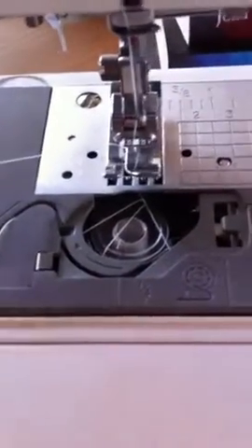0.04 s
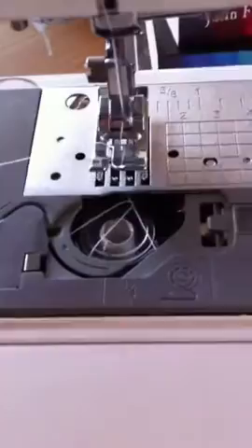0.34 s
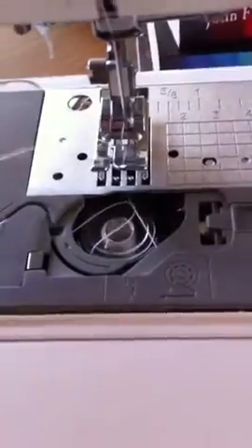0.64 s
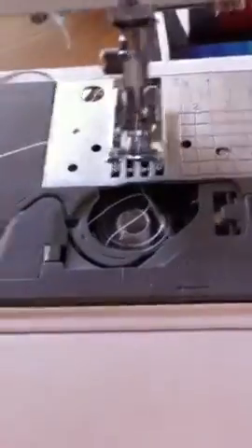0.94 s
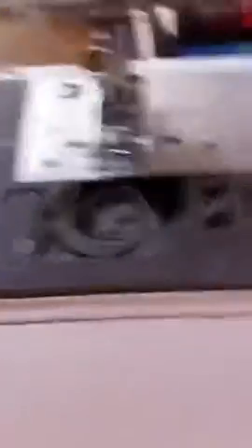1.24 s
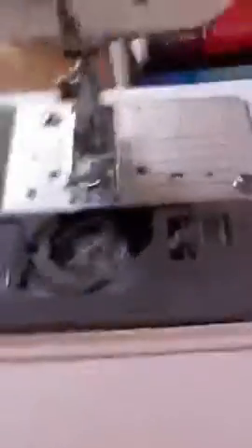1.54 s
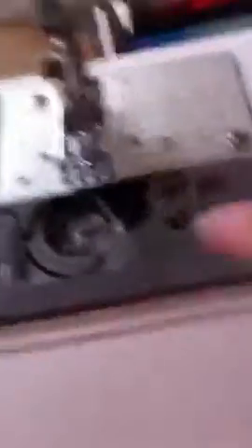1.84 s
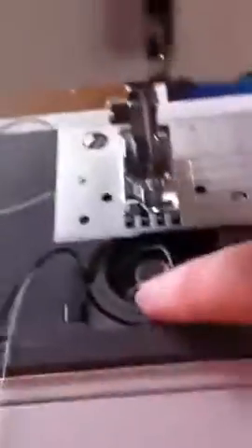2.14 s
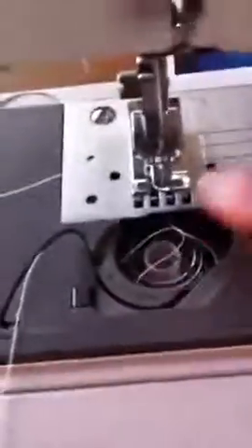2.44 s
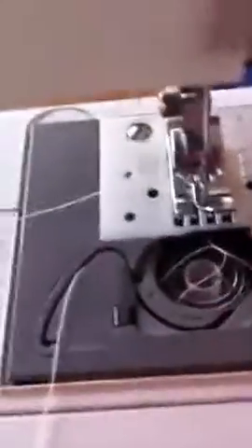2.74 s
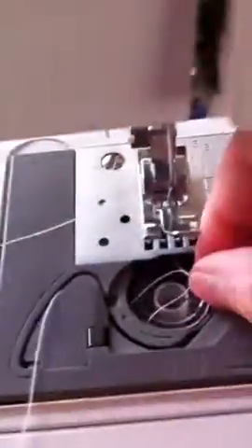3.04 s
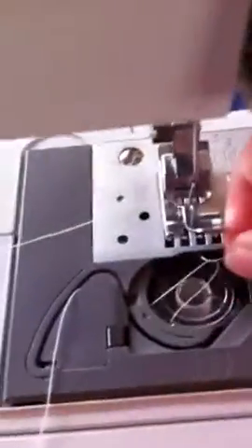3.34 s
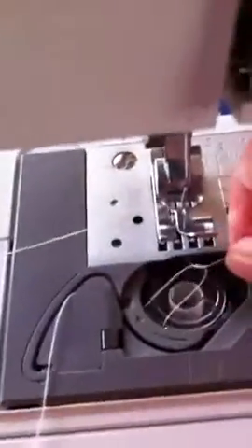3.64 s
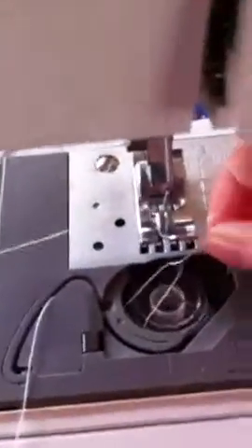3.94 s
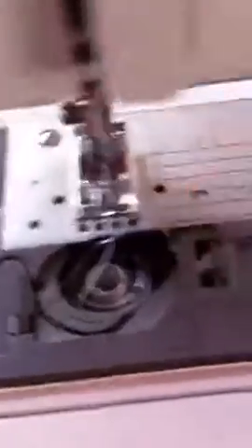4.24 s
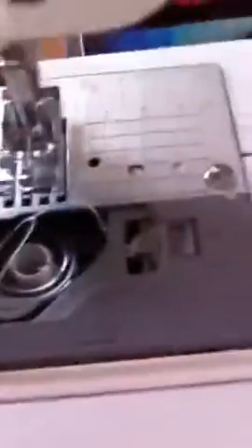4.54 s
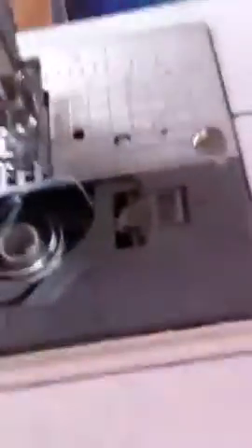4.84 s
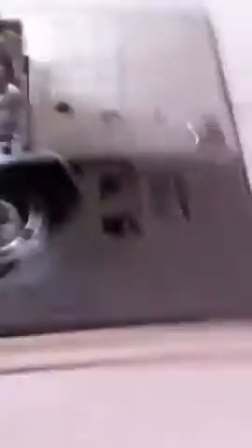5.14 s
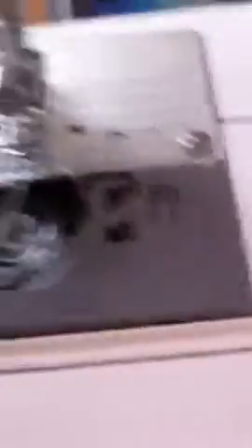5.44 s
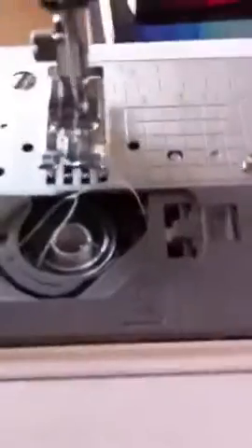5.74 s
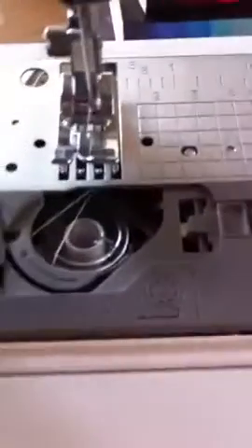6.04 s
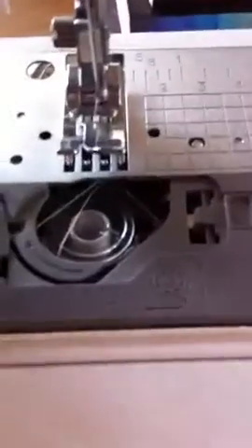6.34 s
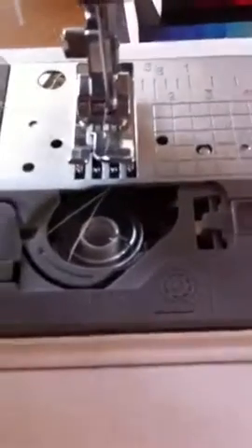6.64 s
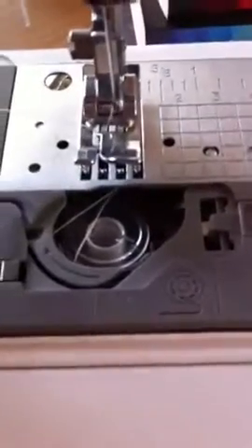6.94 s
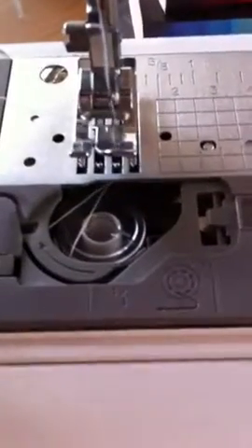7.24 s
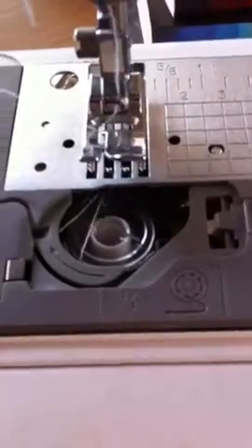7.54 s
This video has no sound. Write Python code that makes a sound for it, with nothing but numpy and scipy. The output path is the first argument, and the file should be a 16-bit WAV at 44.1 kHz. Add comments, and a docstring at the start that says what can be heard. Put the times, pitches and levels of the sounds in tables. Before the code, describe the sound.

Heard close up in a small, quiet room, a light scuff on a metal plate leads into the plastic ticking of a bobbin being fingered in a sewing machine. A sharp pop and a louder, briefly rattling snap come near the middle, followed by soft thuds on the hollow cover. After a lull, a fingernail taps once and the bobbin rubs round with small, uneven clicks.

```python
"""Handling a sewing machine bobbin

In a quiet room, fingers work the thread bobbin in its drop-in case. It ticks against the plastic,
pops out, snaps home on the steel hook and whirrs, then scrapes round as the thread is drawn.
The hollow machine bed answers the contacts; fingers tap, bump and brush the cover and plate.
Blows ring damped modes; stick-slip jerks drive the same modes into scrapes."""
import sys
import numpy as np
from scipy import signal
from scipy.fft import rfft, irfft, next_fast_len
from scipy.io import wavfile
from scipy.ndimage import uniform_filter1d

SR = 44100
rng = np.random.default_rng(int(sys.argv[2]) if len(sys.argv) > 2 else 0)


def wav_out(sig):
    """Save sig, one row per channel (or a flat mono array), as 16-bit PCM at SR to the path in sys.argv[1]."""
    wavfile.write(sys.argv[1], SR, np.round(np.clip(np.atleast_2d(sig).T, -1, 1) * 32767).astype(np.int16))


N = 338247
TIME_S = np.arange(N) / SR
BLOW_S = np.arange(SR // 6) / SR  # time since a blow


def amp(db):
    """Decibels to gain."""
    return 10 ** (np.asarray(db) / 20)


def unit(x):
    """Scale to rms 1."""
    return x / np.sqrt(np.mean(x ** 2) + 1e-20)


def unit_peak(x):
    """Scale the loudest 3 ms to rms 1."""
    return x / np.sqrt(uniform_filter1d(x ** 2, size=128, mode="constant").max())


def decay(t60_s):
    """Exponential decay after a blow."""
    return np.exp(-np.log(1000) * BLOW_S / t60_s)


def swell(start_s, length_s, rise_s=0.0051, fall_s=0.022):
    """Linear rise, hold, exponential release; the defaults suit a stroke."""
    rise = np.clip((TIME_S - start_s) / rise_s, 0, 1)
    return rise * np.exp(-np.maximum(TIME_S - start_s - length_s, 0) / fall_s)


def wobble(rate_hz):
    """Random curve through Gaussian knots."""
    knots = rng.standard_normal(int(N * rate_hz / SR) + 2)
    return np.interp(TIME_S * rate_hz, np.arange(len(knots)), knots)


def log_interp(points, hz):
    """Read (frequency, value) points on a log axis."""
    knots_hz, values = np.transpose(points)
    return np.interp(np.log(hz + 1), np.log(knots_hz + 1), values)


def filtered(x, response):
    """Apply a gain given as a function of frequency."""
    size = next_fast_len(N + SR // 2)
    return irfft(rfft(x, size) * response(np.fft.rfftfreq(size, 1 / SR)), size)[:N]


def coloured(x, spectrum):
    """Shape x by a spectrum table, to rms 1."""
    return unit(filtered(x, lambda hz: amp(log_interp(spectrum, hz))))


def resonate(x, hz, t60_s):
    """One damped mode driven by x."""
    radius = np.exp(-np.log(1000) / (t60_s * SR))
    angle = 2 * np.pi * hz / SR
    return signal.lfilter([0, radius * np.sin(angle)], [1, -2 * radius * np.cos(angle), radius ** 2], x)


def burst(low_hz, high_hz, t60_s):
    """Many close, damped modes: a decaying noise band."""
    band = signal.butter(2, [low_hz, high_hz], "bandpass", fs=SR, output="sos")
    return unit_peak(signal.sosfilt(band, rng.standard_normal(len(BLOW_S)) * decay(t60_s)))


def ring(modes, scatter_db):
    """Struck modes; strength and sign vary with where the blow lands."""
    out = np.zeros(len(BLOW_S))
    for hz, db, t60_s in modes:
        strength = rng.choice([-1, 1]) * amp(db + scatter_db * rng.standard_normal())
        out += strength * np.sin(2 * np.pi * hz * BLOW_S) * decay(t60_s)
    return unit_peak(out)


def blows(events, small_modes, large_modes, ring_db, dense_db, tick_t60_s, dense_t60_s,
          crack_db, crack_t60_s, crack_top_hz, inertia_s):
    """Each blow cracks, rings the small part and knocks the large one; its spot may colour the tick."""
    out = np.zeros(N + len(BLOW_S))
    for time_s, tick_db, knock_db, *spot_hz in events:
        tick = burst(2500, 5940, tick_t60_s)
        tick = unit_peak(tick + amp(ring_db) * ring(small_modes, scatter_db=2.5))
        knock = ring(large_modes, scatter_db=3) + amp(dense_db) * burst(345, 2080, dense_t60_s)
        knock = unit_peak(knock * (1 - np.exp(-BLOW_S / inertia_s)))
        tick += amp(crack_db) * burst(6500, crack_top_hz, crack_t60_s)
        for hz in spot_hz:
            favoured = signal.lfilter(*signal.iirpeak(hz, Q=8.6, fs=SR), tick)
            tick = unit_peak(tick + amp(9) * favoured)
        out[round(time_s * SR):][:len(BLOW_S)] += amp(tick_db) * tick + amp(knock_db) * knock
    return out[:N]


def slips(rate_hz, spread_db):
    """Stick-slip: tiny uneven jerks at random moments."""
    impulses = (rng.random(N) < rate_hz / SR) * rng.choice([-1, 1], N)
    return unit(impulses * amp(spread_db * rng.standard_normal(N)))


# room air: (frequency [Hz], gain [dB])
AIR_SPECTRUM = [(20, -38), (43, -20), (56, -31), (80, -5.5), (108, -7.5), (145, -3), (242, -2), (380, -9),
                (1400, -14.5), (3080, -19), (14000, -27)]
# hum swells: (start [s], length [s], level [dB])
HUM_SWELLS = [(-.05, 1.3, -73), (3.65, 3.7, -73.5)]
def background():
    """Steady room air; a low, wavering hum with its octave swells twice."""
    hum_hz = 76.5 + 4 * wobble(19)
    phase = 2 * np.pi * np.cumsum(hum_hz) / SR
    hum = unit(amp(2.3 * wobble(9.5)) * (np.sin(phase) + amp(-3) * np.sin(2 * phase)))
    envelope = sum(amp(db) * swell(start_s, length_s, rise_s=0.096, fall_s=0.11)
                   for start_s, length_s, db in HUM_SWELLS)
    air = coloured(rng.standard_normal(N), AIR_SPECTRUM)
    return amp(-63) * air + np.maximum(envelope, amp(-86.5)) * hum


# needle plate and its edge: (frequency [Hz], gain [dB], t60 [s])
PLATE_MODES = [(520, -12, .04), (931, 0, .04), (1060, -7, .03), (1890, -26, .33)]
PLATE_EDGE_MODES = [(3650, 0, .015), (4020, 1, .015), (5800, -1, .01), (7900, -2, .008)]
# scuffs: (time [s], tick gain [dB], knock gain [dB])
PLATE_SCUFFS = [(1.0305, -63, -61), (1.0632, -53, -55), (1.0768, -50, -44.5)]
def plate_scuffs():
    """Something light scuffs and knocks on the needle plate."""
    return amp(-3) * blows(
        PLATE_SCUFFS, PLATE_EDGE_MODES, PLATE_MODES, ring_db=9, dense_db=-12, tick_t60_s=0.019,
        dense_t60_s=0.04, crack_db=-6, crack_t60_s=0.045, crack_top_hz=11600, inertia_s=0.00072)


# brushing hiss: (frequency [Hz], gain [dB])
BRUSH_SPECTRUM = [(150, -52), (600, 8.5), (2600, 3), (3800, 1), (4700, -7.5), (5700, 0), (16000, -14)]
# swishes: (centre [s], Gaussian sigma [s], level [dB], sizzle [Hz], bandwidth [Hz])
BRUSH_STROKES = [(1.062, 0.018, -60.5, 3860, 690), (2.264, 0.009, -65, 5640, 1200),
                 (2.288, .03, -69.5, 9600, 2500), (2.79, 0.012, -53, 1540, 900),
                 (4.661, 0.012, -62.5, 5300, 2000), (6.62, 0.093, -69, 3080, 700),
                 (6.622, .075, -70.5, 9000, 600), (7.163, .02, -67.5, 5100, 350),
                 (7.435, .014, -67, 5070, 400)]
def brushing():
    """Skin and thread brush the plate: fine grains, each swish sizzling at its own pitch."""
    hiss = coloured(slips(rate_hz=3600, spread_db=1), BRUSH_SPECTRUM)
    out = np.zeros(N)
    for centre_s, sigma_s, db, sizzle_hz, width_hz in BRUSH_STROKES:
        span = np.abs(TIME_S - centre_s) < 4 * sigma_s
        envelope = np.exp(-.5 * ((TIME_S[span] - centre_s) / sigma_s) ** 2)
        peak = signal.iirpeak(sizzle_hz, sizzle_hz / width_hz, fs=SR)
        sizzle = unit(signal.lfilter(*peak, hiss[span]))
        out[span] += amp(db) * envelope * unit(hiss[span] + amp(2) * sizzle)
    return out


# bobbin rim and machine bed: (frequency [Hz], gain [dB], t60 [s])
RIM_MODES = [(2780, -1, .015), (3050, 0, .015), (3480, -1, .011), (3830, 0, .011), (5080, -1, .013),
             (8900, -8, .009)]
BED_MODES = [(330, -15, .06), (440, -11, .055), (590, -3, .06), (648, -2, .08), (710, -5, .07),
             (835, 0, .07), (940, -4, .05), (1160, -9, .045), (1280, -11, .04), (1470, -8, .035),
             (1670, -8, .03), (1880, -10, .03)]
# catches: (time [s], tick gain [dB], knock gain [dB], spot pitch [Hz])
RIM_CATCHES = [(1.6408, -56.5, -60, 4500), (5.2111, -51.5, -56.5, 4250), (5.6211, -59.5, -56, 3470),
               (6.2073, -52, -67, 5800), (6.5056, -54, -52, 3000), (6.5355, -47, -47.5, 8900),
               (6.6812, -44.5, -39, 3000), (6.7395, -52.5, -69, 3800), (6.7566, -47, -48, 3740),
               (6.8631, -59, -57, 5100), (6.8881, -57, -53.5, 3800), (6.9245, -60, -55, 3030),
               (6.9539, -59, -65, 5060), (7.1462, -53, -55, 5050), (7.2235, -53.5, -48, 3030),
               (7.4216, -56, -49.5, 5000), (7.4882, -58, -68, 9300)]
def rim_catches():
    """The turning bobbin catches on its rim and knocks the bed."""
    return amp(-2) * blows(
        RIM_CATCHES, RIM_MODES, BED_MODES, ring_db=4, dense_db=-11.5, tick_t60_s=0.016,
        dense_t60_s=0.064, crack_db=-1.5, crack_t60_s=0.018, crack_top_hz=14800, inertia_s=0.002)


# plastic case: (frequency [Hz], gain [dB], t60 [s])
CASE_MODES = [(2050, -7, .015), (2680, 0, .018), (2830, 1, .02), (4750, -3, .011), (5080, 1, .012),
              (5900, -3, .01), (6650, -8, .01)]
# contacts: (time [s], tick gain [dB], knock gain [dB], spot pitch [Hz])
CASE_TICKS = [(2.0004, -66, -48.5, 2000), (2.1186, -40.5, -41.5, 2080), (2.1844, -47, -45, 2400),
              (2.2004, -59, -45, 5200), (2.3291, -45.5, -44.5, 2780), (2.4114, -40.5, -45, 5340),
              (2.4244, -46, -52, 2700), (2.4329, -40.5, -46.5, 5000), (2.7546, -59, -47.5, 5000),
              (2.964, -62, -43, 3000), (3.057, -49.5, -48.5, 2500), (3.1785, -68, -47, 2000),
              (3.5274, -54.5, -52, 5000), (6.1105, -48, -38.5, 3460), (6.134, -52, -59, 3370)]
def case_ticks():
    """The fingered bobbin touches its case; the bed answers."""
    return amp(-5) * blows(
        CASE_TICKS, CASE_MODES, BED_MODES, ring_db=8, dense_db=-7.5, tick_t60_s=0.0081,
        dense_t60_s=0.12, crack_db=-17, crack_t60_s=0.026, crack_top_hz=13000, inertia_s=0.0017)


# broad rumble of a push; bass tilt of a soft contact: (frequency [Hz], gain [dB])
PUSH_SPECTRUM = [(100, -26), (300, 1), (690, -5.5), (1000, -13), (3000, -34)]
SOFT_CONTACT_SPECTRUM = [(650, -1), (900, -3.5), (1500, -4), (3000, -2)]
def sliding(strokes, modes, slip_hz, grit_db, shift_db, push_db):
    """Stick-slip rings a part and rumbles in the bed; the moving contact favours changing modes."""
    gaps_s = np.exp(.6 * rng.standard_normal(2000)) / slip_hz
    sizes = amp(3.5 * rng.standard_normal(2000))
    jerks = np.bincount((np.cumsum(gaps_s) * SR).astype(int), sizes, minlength=N)[:N]
    friction = unit(jerks) + amp(grit_db) * slips(rate_hz=2500, spread_db=4)
    scrape = unit(sum(amp(db + shift_db * wobble(17)) * resonate(friction, hz, t60_s)
                      for hz, db, t60_s in modes))
    push = coloured(slips(rate_hz=1500, spread_db=3), PUSH_SPECTRUM)
    bed = np.zeros(N)
    for hz, db, t60_s in BED_MODES:
        gain = amp(db + 3 * wobble(22))
        bed += gain * resonate(slips(rate_hz=900, spread_db=3), hz, .6 * t60_s)  # contact damps the ring
    rumble = coloured(unit(bed) + amp(push_db) * push, SOFT_CONTACT_SPECTRUM)
    pressure = unit(amp(3 * wobble(50)))
    return pressure * sum(swell(start_s, length_s) * (amp(rumble_db) * rumble + amp(scrape_db) * scrape)
                          for start_s, length_s, rumble_db, scrape_db in strokes)


# drags: (start [s], length [s], rumble gain [dB], scrape gain [dB])
FINGER_DRAGS = [(2.085, 0.07, -60, -74), (2.25, 0.13, -64, -63), (2.44, 0.043, -57, -82),
                (2.88, 0.13, -60, -70.5), (3.19, 0.017, -57, -82), (3.25, 0.084, -58, -84)]
def finger_drags():
    """A fingertip drags the bobbin in its case."""
    return amp(-0.5) * sliding(FINGER_DRAGS, CASE_MODES, slip_hz=79, grit_db=5, shift_db=7, push_db=-3.5)


# hollow cover: (frequency [Hz], gain [dB], t60 [s])
COVER_MODES = [(165, -17, .1), (430, -14, .05), (590, -4, .05), (662, 0, .06), (832, 0, .048),
               (935, -3, .042), (1500, -9, .04), (1717, -7, .055), (3420, -17, .03), (4700, -19, .02)]
# bumps: (time [s], level [dB])
COVER_BUMPS = [(2.787, -50), (2.7965, -42.5), (4.062, -44), (4.074, -47), (4.1205, -35), (4.131, -41),
               (4.155, -51)]
def cover_bumps(pad_s=0.0013):
    """A soft finger pad spreads each bump into a dull thud, with a faint click of skin and nail."""
    onset = 1 - np.exp(-(BLOW_S / pad_s) ** 2)
    out = np.zeros(N + len(BLOW_S))
    for time_s, db in COVER_BUMPS:
        thud = unit_peak(ring(COVER_MODES, scatter_db=0) * onset)
        click = amp(-19.5) * burst(2200, 5100, t60_s=0.036)
        out[round(time_s * SR):][:len(BLOW_S)] += amp(db) * (thud + click)
    return out[:N]


# clicks: (time [s], tick gain [dB], knock gain [dB])
THREAD_CLICKS = [(2.9598, -35.5, -54), (3.7873, -48.5, -46), (3.8137, -46, -52)]
def thread_clicks():
    """The taut thread slips and the bobbin clicks drily."""
    return amp(-4) * blows(
        THREAD_CLICKS, RIM_MODES, BED_MODES, ring_db=1, dense_db=-6, tick_t60_s=0.0082,
        dense_t60_s=0.071, crack_db=-19, crack_t60_s=0.0093, crack_top_hz=9800, inertia_s=0.0024)


# bobbin flanges and hollow seat: (frequency [Hz], gain [dB], t60 [s])
FLANGE_MODES = [(2350, -6, .035), (3350, -2, .022), (4620, 0, .022), (4970, 1, .022), (5950, -5, .026),
                (6650, -5, .028), (8300, -8, .025), (9460, -8, .025)]
SEAT_MODES = [(646, -2, .07), (845, 0, .06), (1290, -6, .035), (1523, -4, .04), (1760, -6, .035)]
# pops: (time [s], tick gain [dB], knock gain [dB])
SEAT_POPS = [(3.2753, -28, -28.5), (3.2812, -31.5, -30.5), (3.2868, -41, -36), (3.3116, -43, -45)]
def seat_pops():
    """The bobbin pops out of its seat and falls back."""
    return amp(-1.5) * blows(
        SEAT_POPS, FLANGE_MODES, SEAT_MODES, ring_db=0.5, dense_db=-5, tick_t60_s=0.0048,
        dense_t60_s=0.06, crack_db=-6, crack_t60_s=0.02, crack_top_hz=15800, inertia_s=0.00067)


# steel hook and its carrier: (frequency [Hz], gain [dB], t60 [s])
HOOK_MODES = [(2550, -12, .05), (2760, -5, .04), (3215, -1, .026), (3430, -9, .03), (4585, 4, .024),
              (4920, -3, .025), (5130, 0, .016), (5400, -2, .016), (5905, -5, .022), (6780, -3.5, .036),
              (9400, -11, .02), (10500, -8, .02)]
CARRIER_MODES = [(170, -14, .035), (440, -9, .04), (655, -6, .075), (812, 3, .055), (1165, -7, .07),
                 (1440, -1, .05), (1720, -5, .035)]
# snaps: (time [s], tick gain [dB], knock gain [dB])
HOOK_SNAPS = [(3.7185, -55, -45), (3.7228, -36, -30.5), (3.7262, -29, -32), (3.7274, -16, -35.5),
              (3.7333, -33, -29), (3.7365, -31, -31)]
def hook_snaps():
    """The bobbin snaps home and chatters, ringing the hook and knocking its carrier."""
    return amp(-2.5) * blows(
        HOOK_SNAPS, HOOK_MODES, CARRIER_MODES, ring_db=2.5, dense_db=0, tick_t60_s=0.0023,
        dense_t60_s=0.042, crack_db=-11.5, crack_t60_s=0.019, crack_top_hz=11400, inertia_s=0.00044)


# resonances rubbed by the spin: (frequency [Hz], gain [dB], t60 [s])
WHIRR_MODES = [(420, -7, .12), (592, 0, .2), (720, -6, .07), (870, -9, .045)]
def free_spin():
    """After the snap the bobbin spins on, rattling and whirring in its seat."""
    whirr = sum(amp(db) * unit(resonate(rng.standard_normal(N), hz, t60_s))
                for hz, db, t60_s in WHIRR_MODES)
    rattle = amp(3 * wobble(110))
    envelope = swell(start_s=3.825, length_s=0.11)
    return amp(-56) * unit(whirr * rattle * envelope) * np.sqrt(np.mean(envelope ** 2))


# fingernail tick and dead thud: (frequency [Hz], gain [dB], t60 [s])
NAIL_MODES = [(2950, 4.5, 0.013), (3540, -20, 0.011), (5650, 5, 0.011), (6260, 10, 0.007)]
THUD_MODES = [(370, -1, .035), (485, 1, .03), (867, -1, .025), (1255, -1, .028), (1577, -4, .028),
              (2016, -8, .025)]
# tap: (time [s], tick gain [dB], knock gain [dB])
FINGER_TAP = [(6.2473, -37, -31)]
def finger_tap():
    """One dry tap: the nail ticks over a dead thud."""
    return amp(-6) * blows(
        FINGER_TAP, NAIL_MODES, THUD_MODES, ring_db=20, dense_db=-4.5, tick_t60_s=0.0055,
        dense_t60_s=0.028, crack_db=-7.5, crack_t60_s=0.017, crack_top_hz=11300, inertia_s=0.00058)


# turns: (start [s], length [s], rumble gain [dB], scrape gain [dB])
THREAD_TURNS = [(6.495, 0.27, -57.5, -65), (6.76, 0.18, -57, -64.5), (7.12, 0.12, -59, -68),
                (7.405, 0.11, -67, -68)]
def thread_turns():
    """The drawn thread turns the bobbin, rubbing its rim."""
    return amp(-2) * sliding(THREAD_TURNS, RIM_MODES, slip_hz=105, grit_db=-5, shift_db=5, push_db=1.5)


# room decay: (frequency [Hz], t60 [s])
ROOM_DECAY = [(200, .25), (800, .2), (3000, .12), (12000, .08)]
def room(x):
    """Small furnished room: the treble dies first."""
    hz, time_s, noise = signal.stft(rng.standard_normal(SR // 2), SR, nperseg=256)
    envelope = np.exp(-np.log(1000) * time_s / log_interp(ROOM_DECAY, hz)[:, None])
    _, tail = signal.istft(noise * envelope, SR, nperseg=256)
    return signal.fftconvolve(x, tail / np.linalg.norm(tail))[:N]


def scene():
    """Close handling, faint reverberation and background, in mono."""
    handling = case_ticks() + thread_clicks() + rim_catches() + seat_pops() + hook_snaps()
    handling += finger_tap() + plate_scuffs() + cover_bumps()
    handling += free_spin() + finger_drags() + thread_turns() + brushing()
    low_cut = signal.butter(1, 90, "highpass", fs=SR, output="sos")  # a gentle cut below 90 Hz
    direct = signal.sosfilt(low_cut, handling)
    return (direct + amp(-15.5) * room(direct) + background())[None]


def record(dry):
    """Brick-wall low-pass at 16 kHz."""
    return np.array([filtered(channel, lambda hz: hz < 16000) for channel in dry])


dry = scene()
out = record(dry)
wav_out(out)
```